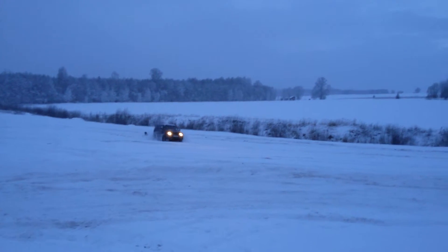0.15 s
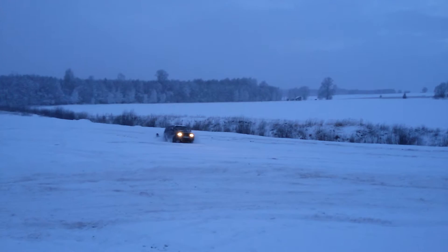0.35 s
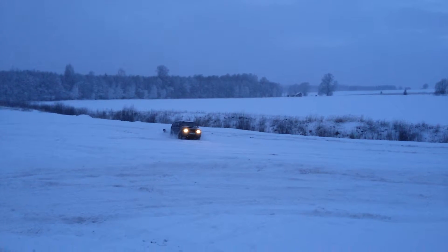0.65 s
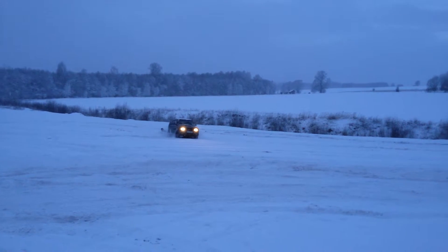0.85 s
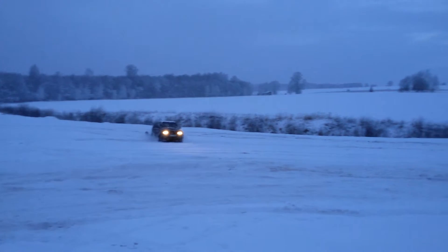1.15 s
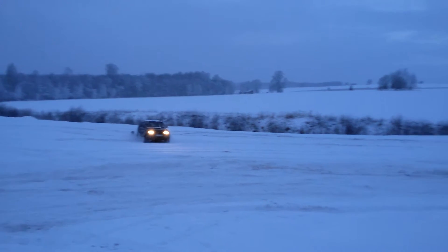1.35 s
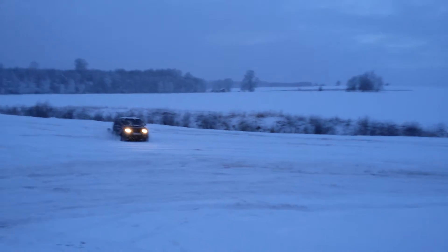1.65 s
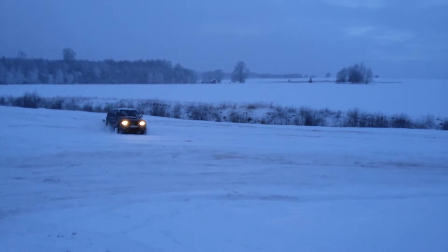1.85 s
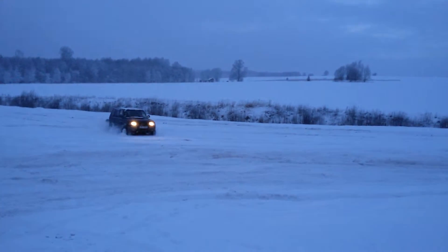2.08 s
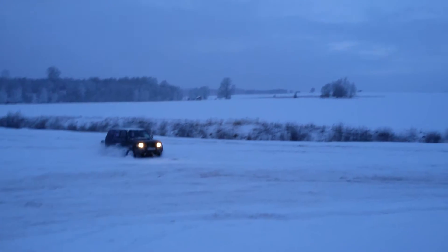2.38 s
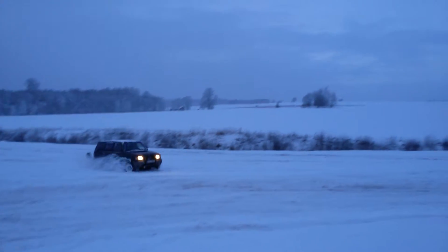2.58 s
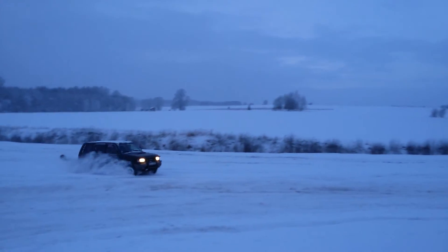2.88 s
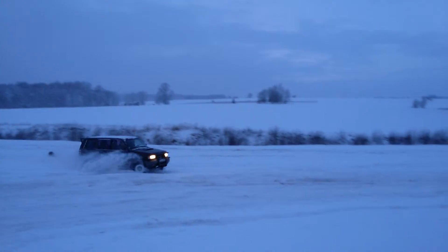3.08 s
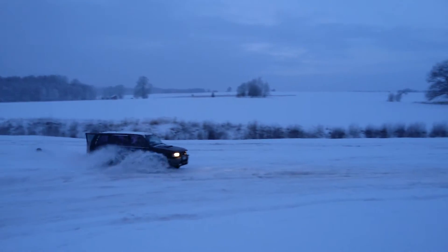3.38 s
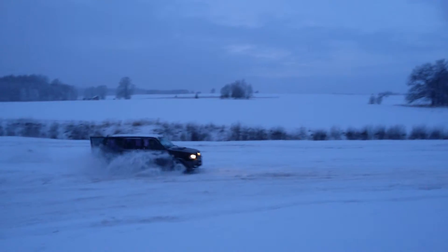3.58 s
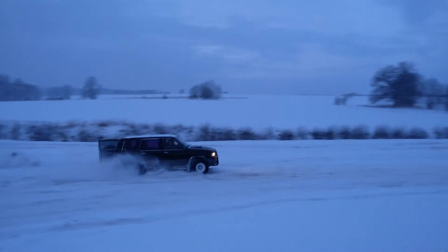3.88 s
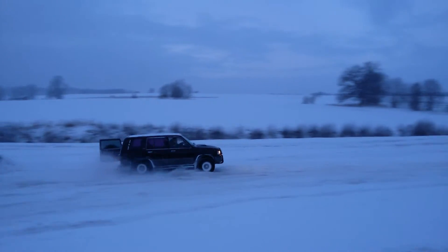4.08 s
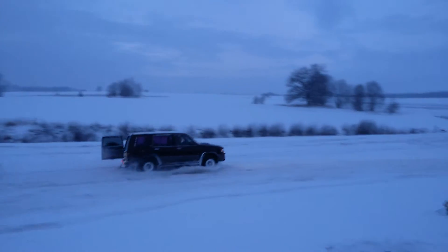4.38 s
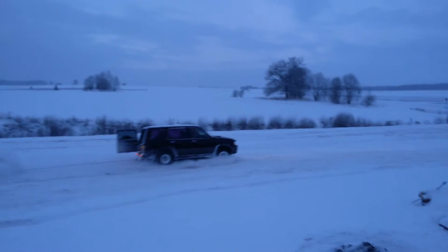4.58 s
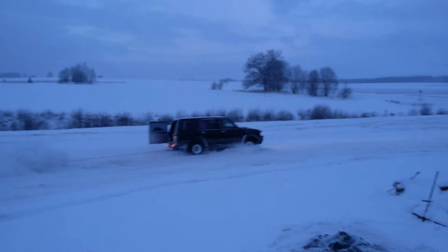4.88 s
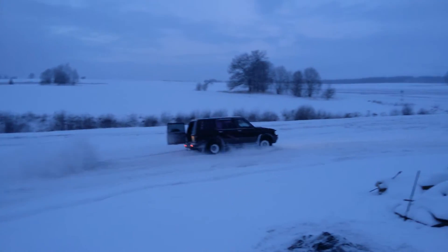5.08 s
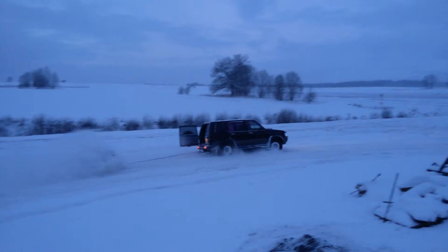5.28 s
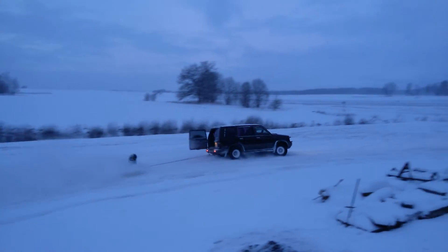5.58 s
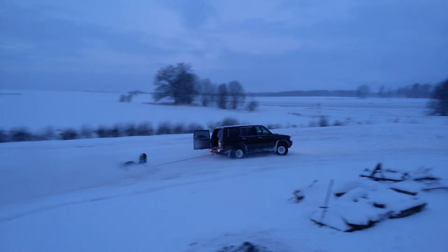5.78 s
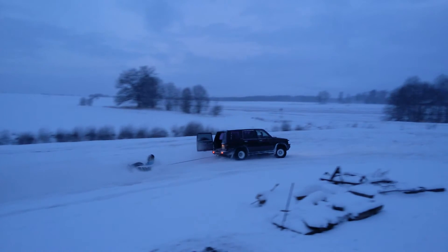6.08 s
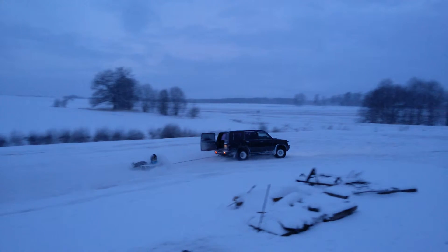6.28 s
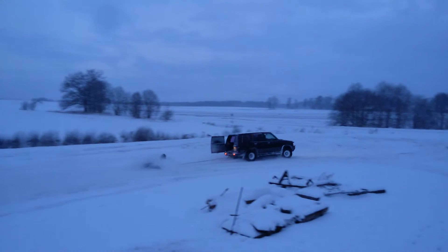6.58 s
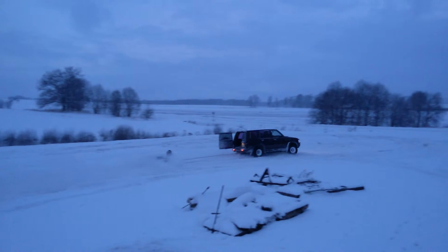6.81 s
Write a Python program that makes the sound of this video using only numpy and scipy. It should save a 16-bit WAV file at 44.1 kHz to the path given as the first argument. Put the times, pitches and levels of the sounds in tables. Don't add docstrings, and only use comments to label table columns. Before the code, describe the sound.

On an open snowfield, a four-cylinder off-road car approaches a small hand-held stereo microphone, its low firing drone steady at first, with thin belt whine around 1 second and bright, grainy spray hiss. Wind thumps the right side near 1.3 seconds. From 2.3 the engine pulls harder; roar, snow crunch and hard metallic valve knocks thicken, densest at 3 to 3.7, with a brief high turbo hiss. At 3.5 the throttle lifts for a third of a second, then snaps open. The sound turns to hollow, pulsing exhaust as the car drives away, surging around 4.5 beside a heavy wind slap. Another lift comes at 5.15 to 5.4, then power returns. Buffeting and fluttering gusts jump between sides from 4.5 onward. A sharp bright tick lands near 5.9, right of centre. The throttle begins closing again at 6.8 and the sound stops mid-gust near 7.

```python
import sys
import numpy as np
from scipy import signal
from scipy.fft import rfft, irfft, next_fast_len
from scipy.io import wavfile
from scipy.ndimage import uniform_filter1d

SR = 44100
rng = np.random.default_rng(int(sys.argv[2]) if len(sys.argv) > 2 else 0)


def ratio_of_db(decibels):
    return 10 ** (np.asarray(decibels, float) / 20)


def wrap_up_sound(samples):
    columns = np.atleast_2d(samples).T
    tamed = np.clip(columns, -1, 1)
    steps = np.round(tamed * 32767).astype(np.int16)
    wavfile.write(sys.argv[1], SR, steps)


N = 306450
STEPS = np.arange(0, N + 64, 64) / SR

# time in seconds, firing tone in dB, load in dB.
EFFORT = [(0, -40, 0.5), (.35, -35, 0.6), (1.3, -35.5, 0.7), (2.07, -35, 2.3), (2.46, -31, 5),
          (3.08, -30.5, 0.5), (3.32, -36.5, -0.5), (3.47, -32.5, 1), (3.9, -32, -0.7), (4.159, -35, -0.6),
          (4.531, -27.5, 0.7), (4.7, -38.5, 0.7), (4.9, -38, 1), (5.6, -41, -1.4), (6.12, -33, 1.1),
          (6.448, -37, -0.8), (6.771, -35.5, -1.2), (6.95, -48, -1.5)]
# start in seconds, length in seconds.
THROTTLE_LIFTS = [
    (3.5, .312),
    (5.14, .284),
    (6.83, .3),
]


def evened(x):
    return x / np.sqrt(np.mean(x ** 2) + 1e-20)


def read(points, hz):
    f, value = np.transpose(points)
    return np.interp(np.log(hz + 1), np.log(f + 1), value)


def played(rows):
    s, *columns = np.transpose(rows)
    return [np.interp(np.arange(N) / SR, s, c) for c in columns]


def fine(control):
    return np.interp(np.arange(N) / SR, STEPS, control)


def swell(middle, half):
    return np.exp(-((STEPS - middle) / half) ** 2)


def drift(size):
    return evened(uniform_filter1d(uniform_filter1d(rng.standard_normal(N), size), size))


def peaks(modes):
    return lambda hz: np.sqrt(sum(ratio_of_db(2 * db) / (1 + (2 * (hz - f) / w) ** 2) ** 3 for f, w, db in modes))


def shape(points):
    return lambda hz: ratio_of_db(read(points, hz))


def noise(gain, likeness=0.96, patchy_db=1.5, size=1024):
    # frequency in Hz, left-right likeness from 0 to 1.
    port_likeness = [(60, 0.84), (300, 1), (700, 0.97), (1400, 1), (2500, 0.9), (4500, 0.2), (7000, 1)]
    # frequency in Hz, radians by which the left port leads.
    left_lead = [(60, 0), (700, 0.18), (1600, .5), (2300, 1.28), (4100, 0.5), (7000, 8)]
    frames, hz = 2 * N // size + 5, np.fft.rfftfreq(size, 1 / SR)
    a, b, c, d, patches = rng.standard_normal((frames, len(hz), 5)).T
    patches = evened(uniform_filter1d(uniform_filter1d(patches, size=8, axis=0), size=5, axis=1))
    same = np.clip(likeness * read(port_likeness, hz), -1, 1)[:, None]
    left = a + 1j * b
    shared = same * left * np.exp(-1j * read(left_lead, hz))[:, None]
    right = shared + np.sqrt(1 - same ** 2) * (c + 1j * d)
    z = np.array([left, right]) * gain(hz)[:, None] * ratio_of_db(patchy_db * patches)
    return evened(signal.istft(z, window="cosine", nperseg=size, noverlap=size // 2)[1][:, :N])


def struck(events, rings, left, right):
    out = np.zeros((2, N + SR))
    for k, ((s, db, *_), ring) in enumerate(zip(events, rings)):
        gains = np.array([[left[k]], [right[k]]])
        out[:, round(s * SR):][:, :len(ring)] += ring * ratio_of_db(db) * gains
    return out[:, :N]


def shut(close_s=0.14, lag_s=0):
    return sum(np.clip(np.minimum((STEPS - s) / close_s, 1 - (STEPS - s - length - lag_s) / 0.0033), 0, 1)
               for s, length in THROTTLE_LIFTS)


def since_open(decay_s):
    return sum((STEPS > s + length) * np.exp(-abs(STEPS - s - length) / decay_s)
               for s, length in THROTTLE_LIFTS)


def heard(part, *timing):
    # time in seconds, heading in degrees from nose-on.
    heading = [(0, 0), (1.8, 40), (2.6, 65), (3.12, 90), (4.05, 120), (4.75, 150), (6.3, 180)]
    aspects = [0, 40, 65, 90, 120, 150, 180]
    parts = {"octave": ([-54, -46, -48, -41, -35.5, -35, -33.5], -9.5, 5),
             "bonnet": ([-53.5, -50, -49.5, -40, -46, -47.5, -44], -2, -2.2),
             "pipe": ([-74, -70.5, -67, -52, -53, -43.5, -42.5], -12.5, -6),
             "boom": ([-64, -57, -59.5, -54, -48.5, -44, -47], -11.5, 0.52),
             "wash": ([-63, -62.5, -60.5, -66, -63, -50, -42], -11.5, .1),
             "churn": ([-75, -82.5, -62, -49, -45, -47.5, -50.5], -0.5, -1.6),
             "spray": ([-64, -53, -55.5, -54, -54.5, -58, -52.5], -3, -1.5),
             "turbo": ([-8, -8, -11, 5, -17, -24, -18.5], -.1, -.1)}
    toward_db, lift_db, surge_db = parts[part]
    facing_db = np.interp(np.interp(STEPS, *np.transpose(heading)), aspects, toward_db)
    s, _, load_db = np.transpose(EFFORT)
    driven_db = facing_db + np.interp(STEPS, s, load_db)
    return fine(driven_db + lift_db * shut(*timing) + surge_db * since_open(0.39))


def engine():
    # time in seconds, firing rate in Hz.
    speed = [(.2, 79.8), (.8, 78.44), (1.25, 79), (1.72, 76.13), (2.46, 80.35), (3.3, 83.93), (3.58, 86.97),
             (3.79, 73.71), (4.14, 77.58), (5.1, 80.66), (5.3, 70), (5.42, 68.3), (5.46, 76.6),
             (5.82, 78.8), (6.12, 82.06), (6.45, 81.3), (6.77, 84.95), (6.95, 79)]
    # multiple of the firing rate, dB relative to the tone (above 2, to its octave).
    minor = [(.5, -31), (1.5, -20.5), (2.5, -50), (3, -19), (5, -25), (5.5, -18), (6, -27)]
    # frequency in Hz, density in dB per Hz.
    bonnet = [(50, -40.5), (90, 12.5), (170, 3), (270, -3.5), (400, 0.5), (670, 3.5), (770, -1.5),
              (1140, -3), (1270, -7.5), (1500, -12), (1750, -13.5), (2560, -14.5), (4000, -24.5),
              (5800, -26.5), (6600, -48.5), (8000, -100)]
    # frequency in Hz, width in Hz, level in dB.
    pipe = [(988, 30, 1.5), (1118, 160, -4), (1413, 73, 2.5), (1558.3, 46, 6), (1694.3, 81, -4)]
    # frequency in Hz, width in Hz, level in dB.
    silencer = [(422.3, 16, 2), (460, 52, -11), (576, 59, -11.5), (675.1, 27, -3.5)]
    # frequency in Hz, density in dB per Hz.
    pipe_wash = [(700, -44.5), (1500, -3), (2300, -4.5), (3400, -13), (4000, -22), (5300, -21.5),
                 (6100, -30), (7200, -52), (9000, -100)]
    # frequency in Hz, width in Hz, level in dB.
    bright = [(1980, 64, 1.5), (2234, 230, 2), (2650, 170, -3.5), (3200, 340, -9.5), (4450, 840, -14.5)]
    # middle in seconds, half length in seconds, level in dB.
    belt = (1.0, .7, -71)
    # closing in seconds, lag in seconds.
    firing = (.04, .03)

    (hz,), overrun = played(speed), fine(shut(*firing))
    tone_db = played(EFFORT)[0] - 6 * overrun
    octave_db = heard("octave", *firing)
    stumble = 1 + 1.86 * overrun
    turns = np.cumsum(hz) / SR + 0.031 * stumble * drift(size=700)
    tone, octave = (ratio_of_db(db + 2.12 * stumble * drift(size=900)) for db in (tone_db, octave_db))
    tones = tone * np.cos(2 * np.pi * turns) + octave * np.cos(4 * np.pi * turns + 2.2)
    for k, db in minor:
        parent = tone + octave if k < 2 else octave
        wave = np.cos(2 * np.pi * (k * turns + rng.random()))
        tones += parent * ratio_of_db(db + 1.6 * drift(size=1500)) * wave

    shot_db = 1.26 * rng.standard_normal(700)[np.clip(turns.astype(int), 0, 699)]
    pulse = ratio_of_db(uniform_filter1d(shot_db, size=100)) * (1 + 0.12 * np.cos(2 * np.pi * turns))
    wash = noise(lambda f: np.hypot(shape(pipe_wash)(f), peaks(bright)(f))) * ratio_of_db([[.8], [-.8]])
    roar = ratio_of_db(heard("bonnet")) * noise(shape(bonnet))
    roar += ratio_of_db(heard("pipe")) * noise(peaks(pipe), patchy_db=2.0)
    roar += ratio_of_db(heard("boom")) * noise(peaks(silencer))
    roar += ratio_of_db(heard("wash")) * wash
    bark = ratio_of_db(5 * fine(since_open(.025)))

    whine_turns = np.cumsum(3360 + 25 * drift(size=300)) / SR
    whine = ratio_of_db(belt[-1] + 2.5 * drift(size=800)) * np.sin(2 * np.pi * whine_turns)
    return np.sqrt(2) * tones * ratio_of_db([[.1], [-.1]]) + roar * pulse * bark + whine * fine(swell(*belt[:-1]))


def knocks():
    # time in seconds, peak in dB.
    loud_knocks = [(1.554, -46), (1.7546, -54), (1.844, -50.5), (2.5109, -54), (2.7134, -43.5),
                   (2.8152, -48), (3.0042, -37), (3.0656, -38), (3.2093, -35.5), (3.2276, -40.5),
                   (3.327, -37), (3.3452, -41), (3.3689, -46), (3.409, -50), (3.422, -37.5), (3.4602, -38),
                   (3.5063, -33.5), (3.533, -37.5), (3.5715, -37), (3.588, -35.5), (3.6126, -39.5),
                   (3.6922, -40.5), (3.8987, -43.5), (4.1882, -44.5)]
    # first, peak and last time in seconds.
    rattle_s = (.5, 3.3, 4.3)
    t = np.arange(700) / SR
    faint = [(s, -48.5 + 1.8 * rng.standard_normal()) for s in rng.triangular(*rattle_s, size=45)]
    hits = loud_knocks + faint
    fade = (1 - np.exp(-t / 0.00044)) ** 2 * ratio_of_db(-60 * t / 0.011)
    scatter = uniform_filter1d(rng.standard_normal((len(hits), 700)), size=60)
    pitch = 2485 * (1 + 0.036 * rng.standard_normal(len(hits)))
    rings = []
    for hz, rough in zip(pitch, scatter):
        part = np.sin(2 * np.pi * hz * t + 1.7 * rough)
        higher = 0.17 * np.sin(2 * np.pi * 1.4 * hz * t)
        lower = 0.17 * np.sin(2 * np.pi * 0.27 * hz * t)
        rings.append(fade * (part + higher + lower))
    return struck(hits, rings, np.full(len(hits), ratio_of_db(10.5)), np.full(len(hits), ratio_of_db(0.0)))


def tyres():
    # frequency in Hz, density in dB per Hz.
    snow = [(90, -34.5), (150, 2), (210, 2), (320, -6), (400, 2.5), (700, -44.5), (2000, -110)]
    return ratio_of_db(heard("churn") + 2.9 * drift(size=500)) * noise(shape(snow))


def port_hiss():
    # frequency in Hz, gain in dB.
    port_left = [(7000, -87.5), (8800, -28.5), (10200, -14.5), (11500, -2.5), (12500, -9.5), (13500, -7),
                 (14600, -11.5), (14700, -87)]
    # frequency in Hz, gain in dB.
    port_right = [(7000, -62.5), (8800, -27), (10200, -15.5), (11200, -2.5), (12000, -10), (13200, -13.5),
                  (14600, -27), (14700, -96.5)]
    # frequency in Hz, width in Hz, level in dB.
    whistles = [(10750, 80, -5), (11050, 60, 0), (11500, 70, -1), (11900, 80, -11)]
    # middle in seconds, half length in seconds, dB over the steady hiss.
    puffs = [
        (0.18, 0.34, 10),
        (1.882, 0.044, 5.5),
        (2.387, .2, 4),
        (3.88, 0.023, 2.5),
        (4.898, 0.24, 4),
        (5.88, .025, 2.5),
        (6.193, 0.091, 1.5),
    ]
    level_db = heard("spray") + fine(sum(db * swell(s, half) for s, half, db in puffs))
    pan_db = -9 - 0.4 * (level_db - level_db.mean())
    size = next_fast_len(N)
    hz = np.fft.rfftfreq(size, 1 / SR)
    grain = ratio_of_db(1.5 * drift(size=60) + 0.94 * drift(size=600))
    left, other = rng.standard_normal((2, N)) * grain
    both = np.array([left, 0.45 * np.roll(left, -4) + 1.3 * other])
    colour = np.array([shape(port_left)(hz), shape(port_right)(hz)])
    hiss = np.array([evened(v) for v in irfft(rfft(both, size) * colour, size)[:, :N]])
    hiss += ratio_of_db(heard("turbo")) * noise(peaks(whistles), patchy_db=3.5)
    return hiss * ratio_of_db(level_db + np.array([pan_db / 2, -pan_db / 2]))


def ticks():
    # time in seconds, peak in dB, left over right in dB.
    taps_at = [
        (0.1926, -37, -3),
        (0.5433, -37, 0),
        (3.793, -40.5, -7),
        (3.9253, -41, -19),
        (4.2565, -35, -9.5),
        (4.8585, -39, -1.5),
        (5.8582, -34.5, -4.5),
        (5.885, -22, -8),
    ]
    t = np.arange(300) / SR
    taps = .5 * rng.standard_normal((len(taps_at), 300)) + np.sin(2 * np.pi * 11300 * t)
    cavity = signal.butter(3, [9800, 13500], "band", fs=SR, output="sos")
    rings = signal.sosfilt(cavity, taps * ratio_of_db(-60 * t / 0.0044))
    side = ratio_of_db(np.array(taps_at)[:, -1] / 2)
    return ratio_of_db(1.5) * struck(taps_at, rings, side, 1 / side)


def wind():
    # middle in seconds, half length in seconds, buffeting in dB, upper flutter in dB,
    # share on the left port from 0 to 1.
    gusts = [(.15, .04, -64, -56, 0.9), (1.312, 0.014, -41, -34.5, 0), (1.37, 0.028, -29, -36, 0),
             (1.515, 0.089, -43, -66, .02), (1.95, 0.22, -51, -59, 0.6), (2.458, 0.031, -59, -53, 0.6),
             (2.883, 0.026, -52, -50, 1), (3.585, .04, -47, -66, 0.87), (3.914, 0.073, -47, -60, 0.8),
             (4.301, 0.22, -42.5, -66, .95), (4.555, 0.12, -31.5, -35.5, 0.02),
             (4.87, 0.11, -29.5, -58, .3), (5.14, 0.076, -38, -62, 0.6), (5.306, 0.054, -32, -48, .9),
             (5.47, 0.061, -31, -46, 0.48), (5.636, 0.069, -33, -43, 0.77), (5.85, 0.21, -28, -35.5, 0.47),
             (6.015, .04, -39, -30.5, 0.9), (6.208, 0.13, -32.5, -37, .6), (6.488, 0.086, -29, -30, 0.97),
             (6.708, 0.12, -30, -26.5, 0.66), (6.914, 0.12, -38.5, -31.5, 0.95)]
    # frequency in Hz, density in dB per Hz.
    buffet_shape = [(25, -42), (40, -18), (60, 5.5), (100, 1), (150, -1.5), (220, -17.5), (350, -35.5),
                    (900, -110)]
    # frequency in Hz, density in dB per Hz.
    flutter_shape = [(40, -70), (90, -19.5), (160, 10.5), (220, -1.5), (320, -1.5), (500, -28), (900, -43),
                     (3000, -110)]
    # time in seconds, peak in dB, pitch in Hz, port (0 left, 1 right).
    slap_rows = [(0.151, -36, 280, 0), (1.294, -19, 139, 1), (1.31, -21.5, 124, 1), (1.377, -22.5, 208, 1),
                 (4.492, -29, 158, 1), (4.534, -11.5, 174, 1), (5.269, -20, 133, 0), (5.429, -22, 196.8, 0),
                 (5.659, -13, 147, 0), (5.809, -23, 140, 1), (6.0, -19.5, 200, 0), (6.442, -15, 190, 1),
                 (6.47, -31, 147, 0), (6.708, -24, 167, 1)]
    low, high = ratio_of_db(2 * -58) * np.array([[0.23], [1 - 0.23]]), 0
    for middle, half, buffet_db, flutter_db, left in gusts:
        power = swell(middle, half) ** 2 * np.clip([[left], [1 - left]], .01, .99)
        low = low + ratio_of_db(2 * buffet_db) * power
        high = high + ratio_of_db(2 * flutter_db) * power
    low, high = ([fine(port) for port in power] for power in (low, high))
    lumps = ratio_of_db(0.37 * np.array([drift(size=400), drift(size=400)])) * np.sqrt(2)
    buffet = np.sqrt(np.abs(low)) * ratio_of_db(0.5) * noise(shape(buffet_shape), likeness=0.023, size=2048)
    flutter = np.sqrt(high) * noise(shape(flutter_shape), likeness=0.046)
    t = np.arange(900) / SR
    slaps = []
    for _, _, hz, _ in slap_rows:
        slaps.append(-np.sin(2 * np.pi * hz * t) * np.sin(np.pi * np.clip(hz * t / 2.08, 0, 1)))
    port = np.round(np.array(slap_rows)[:, -1])
    return lumps * (buffet + flutter) + struck(slap_rows, slaps, 1 - port, port)


def field():
    # frequency in Hz, density in dB per Hz.
    wash_shape = [(150, -37), (250, -4.5), (349, -14), (462, -10.5), (516, -16.5), (940, -12),
                  (1330, -11.5), (3390, -20.5), (4800, -22), (5680, -32), (7000, -61.5), (9100, -105),
                  (15400, -120)]
    return ratio_of_db(-56) * noise(shape(wash_shape), likeness=0.32, patchy_db=2.0)


def scene():
    return engine() + knocks() + tyres() + port_hiss() + ticks() + wind() + field()


def band_limit(x):
    return signal.sosfilt(signal.butter(12, 14840, fs=SR, output="sos"), x)


def record(dry):
    cut = signal.sosfilt(signal.butter(4, 44, "high", fs=SR, output="sos"), dry)
    return band_limit(cut - .0006)


dry = scene()
out = record(dry)
wrap_up_sound(out)
```